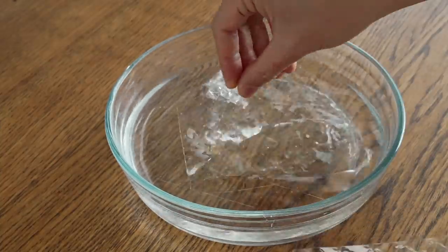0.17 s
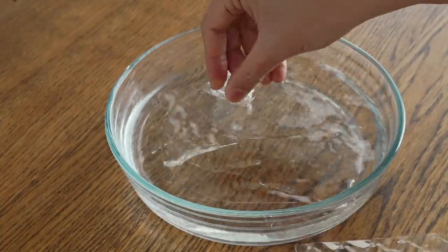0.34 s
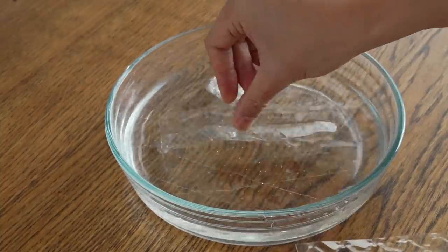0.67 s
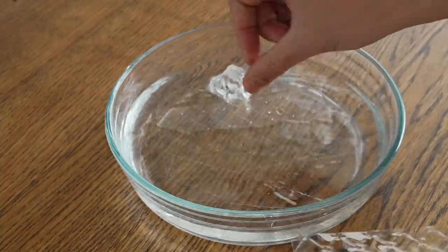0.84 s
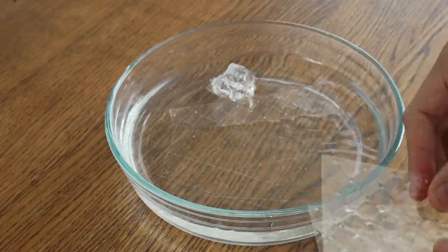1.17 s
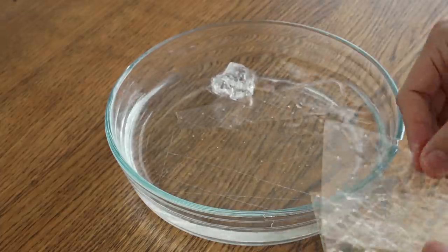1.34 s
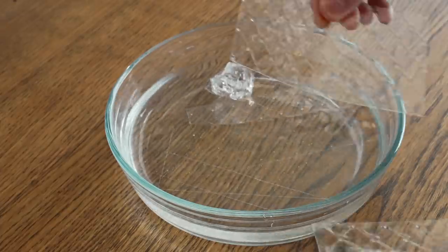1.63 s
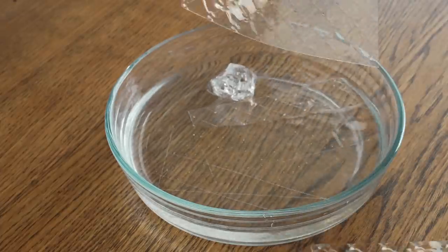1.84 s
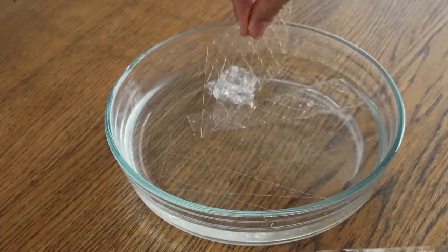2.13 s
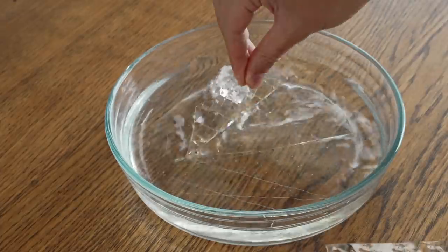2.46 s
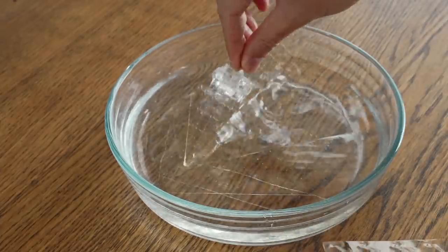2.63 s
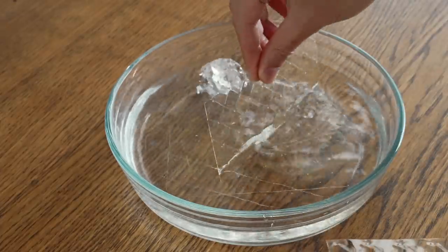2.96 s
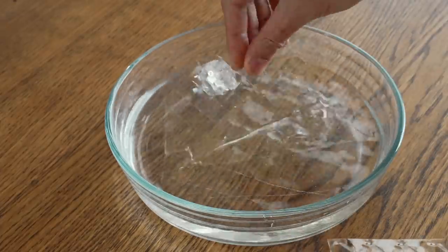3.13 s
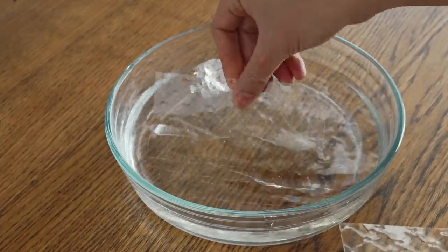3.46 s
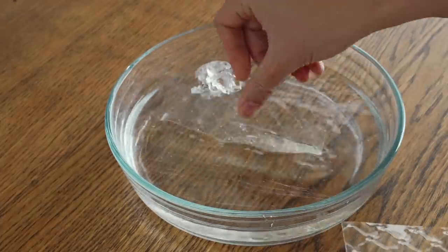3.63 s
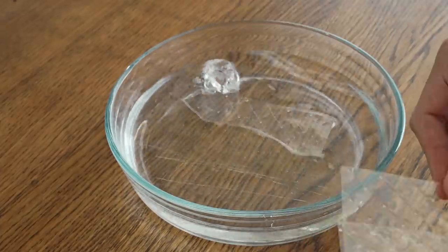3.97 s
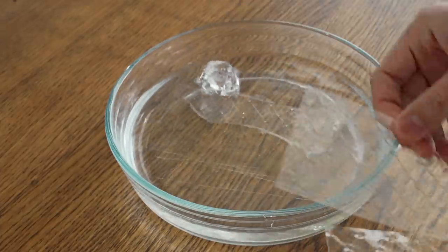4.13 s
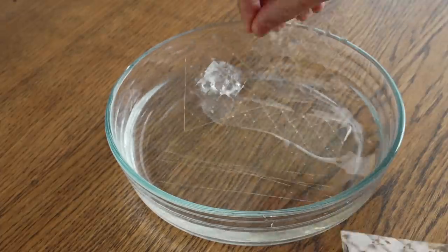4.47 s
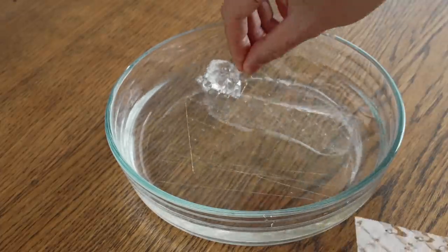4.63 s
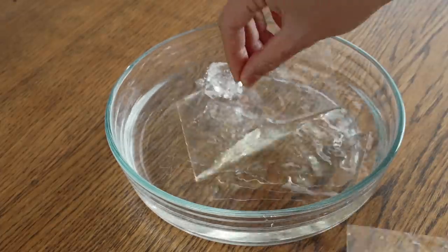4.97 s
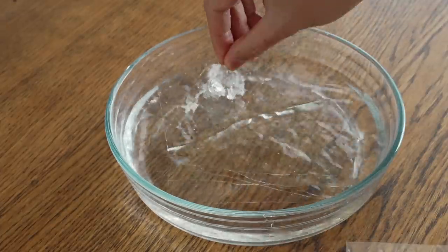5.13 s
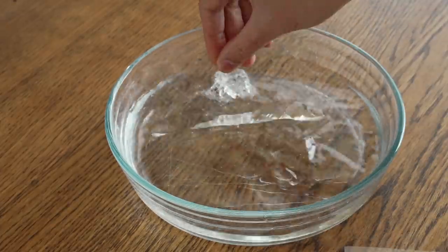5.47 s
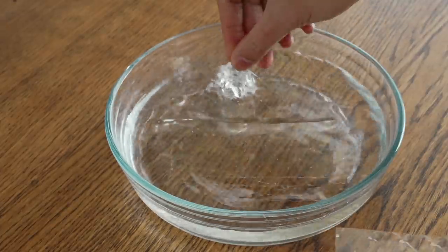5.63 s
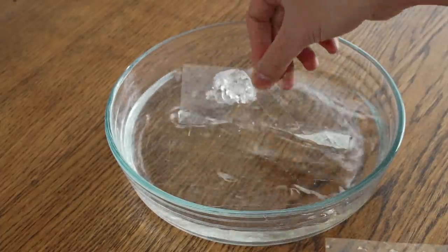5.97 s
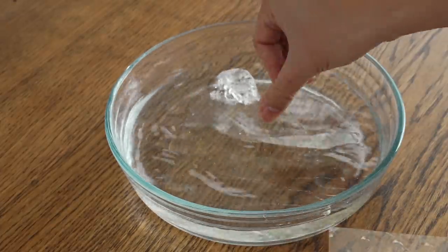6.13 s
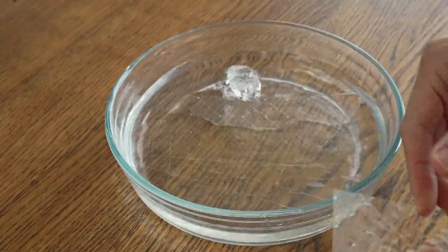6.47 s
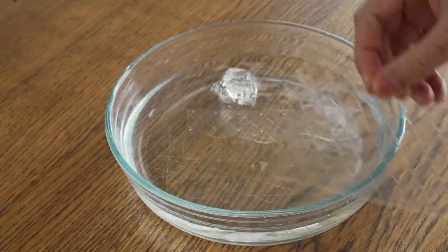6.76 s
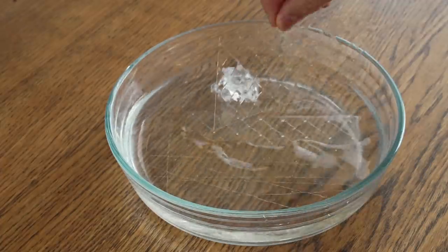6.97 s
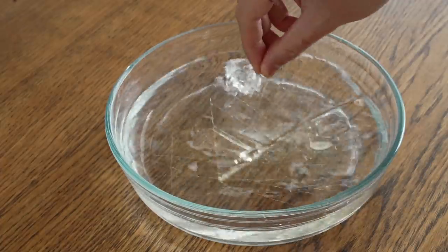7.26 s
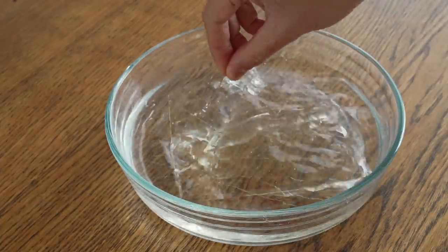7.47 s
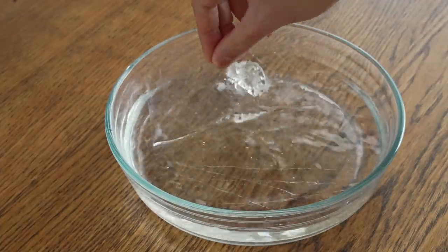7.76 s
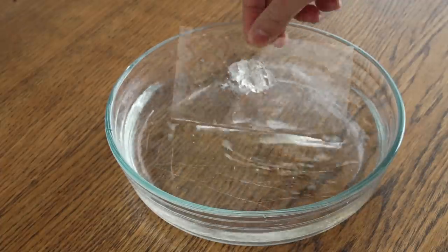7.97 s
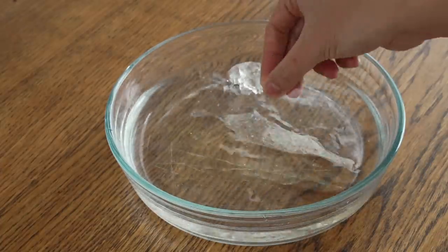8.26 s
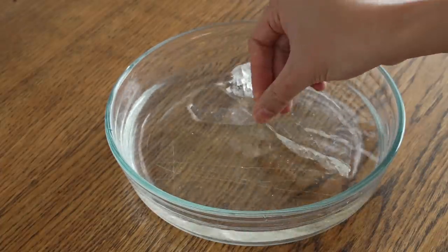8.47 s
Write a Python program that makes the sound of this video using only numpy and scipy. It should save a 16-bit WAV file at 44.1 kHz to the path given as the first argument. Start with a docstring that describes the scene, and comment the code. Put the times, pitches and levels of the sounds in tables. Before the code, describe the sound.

Close, dry and detailed in a small quiet room with barely audible air. Faint crackles and soft rubs open; a scrape swells into a bright sharp flick with a soft slap at 0.7 s. Tiny plops and crisp ticks come near 0.95 s. From 1.15 to 1.85 s, two ridged sheets rasp and crackle off the stack, with stray ticks until 2 s. Snaps and a small wet plop follow at 2.3 s, sparse quiet crackle, dull slaps at 3.4 s and a flick at 3.65 s. A stronger ratcheting drag runs 4.0-4.25 s, then wet slaps and a flop around 4.7 s. Quiet lapping and slaps lead to snaps and a loud flick at 6.0-6.2 s. More crackles and a table-side flick at 6.8 s precede heavy slaps at 7.15 s, the sharpest smack at 7.47 s, wet slaps at 8.15 s, and closing flicks at 8.4 and 8.55 s.

```python
"""Gelatin sheets pushed into a bowl of water

Stiff gelatin sheets are drawn from a stack and pushed one by one into a glass bowl of water on a wooden table.
Dry sheets crackle and snap as they bend: short bursts of noise, coloured by a bending resonance.
They scrape over one another and flick free: dense random grains that swell and end in a loud burst.
They slap the water, which laps in dull grains, plops in rising sine tones and faintly rings the bowl.
A small, quiet room answers with a short noise tail, over still air and a trace of hum."""
import sys
import numpy as np
from scipy import signal
from scipy.fft import rfft, irfft, next_fast_len
from scipy.io import wavfile
from scipy.ndimage import uniform_filter1d, map_coordinates

SR = 44100
rng = np.random.default_rng(int(sys.argv[2]) if len(sys.argv) > 2 else 0)


def transcribe(u):
    """Save the signal u as a 16-bit wav file named by the first command-line argument.

    u: samples, shape (n,) or (channels, n), limited to [-1, 1]; the rate is SR.
    q: integer samples, one column per channel.
    """
    v = np.clip(np.atleast_2d(u).T, -1, 1)
    q = np.round(v * 32767).astype(np.int16)
    wavfile.write(sys.argv[1], SR, q)


N = 379258  # length of the scene [samples]


def amp(db):
    """Turn decibels into an amplitude factor."""
    return 10 ** (np.asarray(db) / 20)


def unit(x):
    """Scale a signal to an rms of 1."""
    return x / np.sqrt(np.mean(x ** 2) + 1e-20)


def along(points, hz):
    """Read (frequency, value) points at any frequency, on a log axis."""
    point_hz, values = np.transpose(points)
    return np.interp(np.log(hz + 1), np.log(point_hz), values)


def add(track, s, x):
    """Mix x into the track at time s."""
    i = max(round(s * SR), 0)
    track[i:i + len(x)] += x[:max(len(track) - i, 0)]


def coloured(x, gain_db):
    """Filter x by a dB function of frequency, with no sound ahead of its cause (minimum phase)."""
    m = 2 * next_fast_len(len(x) // 2 + 1024)
    log_gain = np.maximum(gain_db(np.fft.rfftfreq(m, 1 / SR)), -120) * np.log(10) / 20
    cepstrum = irfft(log_gain)
    # Folding the second half onto the first makes the filter minimum phase
    cepstrum[1:m // 2] *= 2
    cepstrum[m // 2 + 1:] = 0
    return irfft(rfft(x, m) * np.exp(rfft(cepstrum)))[:len(x)]


def peaks(modes, hz):
    """Add up the dB gain of a few (centre [Hz], width [Hz], gain [dB]) resonances."""
    return sum(db / (1 + (2 * (hz - centre) / width) ** 2) for centre, width, db in modes)


def tone(thump_db, bite_db, sizzle_db):
    """Spectrum of one contact, from thump (bass) to sizzle (treble); a thin sheet radiates little bass."""
    points = [(60, thump_db - 35.5), (170, thump_db - 22.5), (330, thump_db - 4.0), (700, thump_db - 0.5),
              (1250, 0.3), (2200, 0.94), (3300, bite_db + 3), (6000, bite_db - 0.5),
              (9500, sizzle_db + .5), (16000, sizzle_db - 8)]
    return lambda hz: along(points, hz)


DRY_BITE_DB, DRY_BITE_SHARE = 4, .35  # the upper mids of a dry contact follow its sizzle


def dry_tone(thump_db, sizzle_db):
    """Spectrum of a dry snap."""
    return tone(thump_db, DRY_BITE_DB + DRY_BITE_SHARE * sizzle_db, sizzle_db)


def grains(size, rate, spread_db):
    """Tiny stick-slip releases of uneven size, about rate per second, rms 1."""
    hit = rng.random(size) < rate / SR
    sign = rng.choice([-1, 1], size)
    strength = amp(spread_db * np.minimum(rng.exponential(size=size), 4))
    return unit(hit * sign * strength)


def burst(fade_s, swell, colour):
    """A short shudder of the sheet, with the energy of 10 ms at rms 1; longer ones build up more slowly."""
    t, life = np.arange(SR // 8) / SR, max(fade_s, .002)
    rise = 1 - np.exp(-t / (swell * life))
    spectrum = rfft(rng.standard_normal(len(t)) * rise * amp(-60 * t / life))
    # Partly flatten the random spectrum, so that the colour filter sets the tone
    even = irfft(spectrum / np.sqrt(abs(spectrum) + 1e-12), len(t))
    x = coloured(even * rise * np.exp(-t / life), colour)
    return x * np.sqrt(SR / 100 / np.sum(x ** 2))


def shudder(colour, bend_hz, fade_s, swell, ring_db, ring_width):
    """One contact; the free length of the sheet sets its bending resonance."""
    bend = [(bend_hz, ring_width * bend_hz, ring_db)]
    return burst(fade_s, swell, lambda hz: colour(hz) + peaks(bend, hz))


# Where the held sheet is: (time [s], place [0 = over the stack, 1 = inside the bowl])
SHEET_PLACE = [(1.0, 1), (1.1, 0), (2.1, 0), (2.25, 1), (3.8, 1), (3.9, 0), (4.4, 0), (4.5, 1), (6.4, 1),
               (6.5, 0), (6.95, 0), (7.05, 1)]


def inside(s):
    """How far the held sheet is over the bowl at time s, 0-1."""
    return np.interp(s, *np.transpose(SHEET_PLACE))


# Tone of the still air in the room: (frequency [Hz], relative level [dB])
STILL_AIR = [(20, -26.5), (70, -32), (130, -25.5), (240, -19), (400, -25.5), (600, -28.5), (1000, -28.5),
             (2000, -33.5), (4400, -37), (10000, -44), (14000, -45.5), (16000, -40)]


def background(air_db, hum_hz, hum_db):
    """Still air as coloured noise, and a trace of mains hum as a sine."""
    air = unit(coloured(rng.standard_normal(N), lambda hz: along(STILL_AIR, hz)))
    hum = np.sin(2 * np.pi * hum_hz * np.arange(N) / SR)
    return amp(air_db) * air + amp(hum_db) * hum


# How long the room echoes: (frequency [Hz], time to fade by 60 dB [s])
ROOM_FADE = [(150, 0.12), (500, 0.31), (1500, 0.2), (5000, 0.23), (10000, 0.18), (16000, .2)]


def room(x, wet_db, treble_db, delay):
    """A short diffuse tail of fading noise, with fresh noise each quarter second."""
    out, step = np.zeros(N), SR // 4
    for i in range(0, N, step):
        hz, t, noise = signal.stft(rng.standard_normal(SR // 2), SR, nperseg=256)
        fade = amp(-60 * t / along(ROOM_FADE, hz)[:, None]) * (1 - np.exp(-t / delay))
        tail = signal.istft(noise * fade, SR, nperseg=256)[1]
        add(out, i / SR, signal.fftconvolve(x[i:i + step], tail / np.linalg.norm(tail)))
    colour = [(300, 1), (1500, -1.6), (6000, treble_db), (15000, treble_db)]
    return coloured(out, lambda hz: wet_db + along(colour, hz))


# Ringing tones of the glass bowl: (frequency [Hz], relative level [dB], time to fade by 60 dB [s])
BOWL_TONES = [(768.4, -5, 0.17), (1300, -6.5, .14), (1660, -6.5, .15), (1680, -10.5, 0.44),
              (1970, -5.5, 0.27), (3700, -8.5, .2), (4050, -8.5, .2)]


def bowl(x, ring_db):
    """The water-damped glass rings in fading sines with the slaps and lapping of the water."""
    t = np.arange(SR // 2) / SR
    ring = sum(amp(db - 60 * t / t60) * np.sin(2 * np.pi * hz * t) for hz, db, t60 in BOWL_TONES)
    return amp(ring_db) * signal.fftconvolve(x, ring)[:N]


# Resonances of the hollow of the bowl: (centre [Hz], width [Hz], gain [dB])
BOWL_HOLLOW = [(355, 87, 8.5), (520, 50, 1.5), (910, 67, -2.5), (1450, 160, 3), (1664, 89, 2),
               (2170, 210, -3), (2560, 350, 2), (2980, 430, -1), (3570, 310, 5), (4210, 100, 1),
               (5030, 1100, -1), (5900, 520, -1.5), (7710, 1000, 2)]
# Resonances of a sheet held just above the table top: (centre [Hz], width [Hz], gain [dB])
ABOVE_TABLE = [(790, 490, 4), (1460, 350, -7.5), (2010, 140, 4.5), (2850, 440, -6.5), (3500, 520, -0.5),
               (4670, 590, -1.5)]


def surroundings(sheets, over_bowl):
    """The hollow bowl or the table top colours the sound, depending on where the sheet is."""
    in_bowl = coloured(over_bowl * sheets, lambda hz: peaks(BOWL_HOLLOW, hz) - 1.5)
    at_table = coloured((1 - over_bowl) * sheets, lambda hz: peaks(ABOVE_TABLE, hz) - .6)
    return in_bowl + at_table


# Air bubbles: (time [s], starting pitch [Hz], level before a 6.5 dB lift [dB], time to fade by 60 dB [s])
AIR_BUBBLES = [(.916, 1102, -42, 0.06), (.916, 1774, -38.5, 0.018), (2.363, 1640, -30, 0.017),
               (2.937, 2740, -65.5, 0.15), (5.199, 8500, -63, .09), (6.527, 1126, -47.5, 0.049),
               (6.526, 1837, -48, 0.029), (7.154, 2675, -41.5, 0.22), (7.301, 3570, -57, 0.054),
               (7.301, 5010, -57.5, .05), (7.549, 5990, -31.5, 0.027), (7.569, 7280, -46.5, 0.087),
               (7.569, 2830, -46.5, 0.047), (8.036, 1213, -53, 0.023)]


def bubbles(rise, attack):
    """Each bubble rings and climbs a little in pitch as it nears the surface."""
    out, t = np.zeros(N), np.arange(SR // 5) / SR
    for s, hz, db, t60 in AIR_BUBBLES:
        pitch = hz * (1 + rise * np.minimum(t / t60, 1))
        phase = 2 * np.pi * np.cumsum(pitch) / SR
        add(out, s, amp(db + 6.5 - 60 * t / t60) * np.sin(phase) * (1 - np.exp(-t / attack)))
    return out


def slosh(splashes, rate, life, slosh_db):
    """Water stirred by a slap keeps lapping in small, dull grains."""
    keep = np.exp(-1 / (life * SR))
    stir = np.sqrt(signal.lfilter([1 - keep], [1, -keep], splashes ** 2))
    colour = [(100, -26.0), (330, -8.0), (800, -0.5), (1500, 2), (3000, -9.5), (8000, -26.5), (16000, -49.5)]
    laps = coloured(grains(N, rate, spread_db=1.0), lambda hz: along(colour, hz))
    return amp(slosh_db) * stir * unit(laps)


# A whole sheet flopping over: (time [s], level [dB], fade setting [s], centre [Hz])
SHEET_FLOPS = [(0.436, -44, 0.046, 297), (0.461, -53.5, 0.066, 290), (0.736, -45.5, 0.03, 300),
               (3.404, -52.5, 0.051, 225.5), (4.693, -39, 0.073, 377.5), (6.191, -48.5, 0.072, 320),
               (6.827, -44.5, 0.1, 354), (7.153, -35.5, 0.064, 438.4)]


def flops(swell, octaves):
    """A flopping sheet pushes out a soft, low puff of air."""
    out = np.zeros(N)
    for s, db, fade_s, centre_hz in SHEET_FLOPS:
        colour = lambda hz: -20 * np.log10(1 + (np.log2((hz + 1) / centre_hz) / octaves) ** 6)
        add(out, s, amp(db) * burst(fade_s, swell, colour))
    return out


# A sheet hits the water: (time [s], level [dB], fade setting [s], sizzle [dB], bending resonance [Hz])
WATER_SLAPS = [(.738, -41, .022, -15, 664), (2.362, -46, .016, -39, 1610), (2.869, -62, .02, -19.5, 1500),
               (2.935, -51, 0.029, -45, 1590), (3.333, -52, 0.03, -36, 1250),
               (3.357, -50.5, 0.045, -45.5, 950), (3.398, -43, 0.031, -49.5, 710),
               (3.412, -44.5, .03, -47.5, 496), (4.234, -41.5, 0.0095, -28, 1060),
               (4.682, -34.5, .014, -25, 2720), (4.6905, -29.5, 0.018, -44, 1540),
               (4.723, -36, .018, -24.5, 1430), (4.762, -48.5, .016, -34, 1490),
               (4.785, -54.5, .05, -28.5, 1500), (4.888, -57, .035, -45, 1420),
               (5.172, -53.5, .07, -50, 1580), (5.229, -55.5, .06, -40, 1460),
               (5.307, -57, .017, -42, 1530), (5.52, -50, .03, -64, 1530), (5.697, -42, 0.027, -40.5, 1450),
               (5.702, -39.5, 0.024, -42, 1410), (5.992, -39.5, .015, -30, 1488),
               (5.995, -31.5, .036, -42.5, 1364), (6.827, -39.5, .03, -26, 397),
               (7.132, -26, .022, -18.5, 1544), (7.151, -25.5, .018, -22.5, 1250),
               (7.16, -30.5, .014, -30, 1170), (7.173, -38.5, .048, -31.5, 1120),
               (7.206, -37.5, .018, -33, 1670), (7.229, -42, .007, -36.5, 1460),
               (7.461, -40, .03, -22, 1410), (7.4712, -20, .016, -22.5, 1840),
               (7.748, -38.5, .028, -36.5, 1450), (8.037, -66.5, 0.018, -35, 1290),
               (8.156, -31, 0.024, -53, 1550), (8.181, -35.5, .014, -41, 1960),
               (8.218, -50, 0.041, -34, 2460)]
WET_BITE_DB, WET_BITE_SHARE = 3, 0.47  # the upper mids of a slap follow its sizzle
# A longer sheet bends lower and thumps more
MID_BEND_HZ, SLAP_THUMP_DB, THUMP_DB_PER_OCTAVE, MAX_THUMP_DB = 1350, -2, -20, 9
USUAL_SIZZLE_DB, FLAT_HIT_SHARE = -32, 0.26  # a flatter, brighter slap also thumps more


def slaps():
    """The lower a sheet bends and the flatter it lands, the more water it pushes and the more it thumps."""
    out = np.zeros(N)
    for s, db, fade_s, sizzle_db, bend_hz in WATER_SLAPS:
        thump_db = SLAP_THUMP_DB + THUMP_DB_PER_OCTAVE * np.log2(bend_hz / MID_BEND_HZ)
        thump_db += FLAT_HIT_SHARE * (sizzle_db - USUAL_SIZZLE_DB)
        colour = tone(min(thump_db, MAX_THUMP_DB), WET_BITE_DB + WET_BITE_SHARE * sizzle_db, sizzle_db)
        add(out, s, amp(db) * shudder(colour, bend_hz, fade_s, swell=.14, ring_db=8.5, ring_width=0.3))
    return out


# Resonances of a sheet singing as it slides: (centre [Hz], width [Hz], gain [dB])
SLIDING_TONES = [(1250, 230, -1.5), (2530, 450, -0.5), (3020, 300, -4.5), (4070, 600, 2.5),
                 (13000, 4100, 1.5)]
RUB_BITE_DB, RUB_BITE_SHARE = 4, 0.64  # the upper mids of friction follow its sizzle
FLUTTER_HZ, FLUTTER_DB = 61, 2.1  # the pressure wavers: random values per second, and their spread


def scrape(size, thump_db, sizzle_db):
    """Dense stick-slip grains under uneven pressure, through the resonances of a sliding sheet, rms 1."""
    colour = tone(thump_db, RUB_BITE_DB + RUB_BITE_SHARE * sizzle_db, sizzle_db)
    knots = np.arange(size) * FLUTTER_HZ / SR
    waver = map_coordinates(rng.standard_normal(int(knots[-1]) + 2), [knots], mode='nearest')
    force = amp(FLUTTER_DB * waver) * grains(size, rate=1800, spread_db=1.27)
    return unit(coloured(force, lambda hz: colour(hz) + peaks(SLIDING_TONES, hz)))


# Soft rubs that swell and fade without a flick; all friction of this kind is later turned down 1 dB:
# (start time [s], length [s], level before that [dB], thump [dB], sizzle [dB])
SOFT_RUBS = [(.25, .06, -56.5, -26, -31), (.36, .08, -54.5, -13, -32), (.42, .065, -37.5, -7.5, -15),
             (.505, 0.11, -39, -25, -24.5), (.98, .13, -60.5, -6, 19), (1.82, 0.11, -63, -4, -13),
             (1.945, 0.12, -48.5, -15, -13), (2.28, .14, -44, -4.5, -37.5), (3.12, 0.12, -65.5, -18, -27.5),
             (3.225, .075, -53.5, -2, -6), (3.4, .13, -58, -6.5, -22), (3.5, 0.044, -48, -24, -21),
             (3.555, 0.057, -33.5, -38, -18.5), (3.92, 0.079, -56.5, -9.5, -2),
             (4.47, 0.19, -71.5, -4, -14), (4.93, 0.23, -62.5, -6.5, -12), (5.055, 0.051, -54.5, -11, -12),
             (6.04, .09, -39, -25, -15.5), (6.42, 0.063, -66, -2, -13.5), (6.54, .055, -44.5, 0.5, -14.5),
             (6.66, .08, -56.5, -21, -5.5), (8.18, 0.103, -50.5, -30, -35)]


def rubs(arch):
    """Friction rises and falls with the speed of the hand."""
    out = np.zeros(N)
    for s, length, db, thump_db, sizzle_db in SOFT_RUBS:
        speed = abs(np.sin(np.linspace(0, np.pi, int(length * SR))))
        add(out, s, amp(db) * speed ** arch * scrape(len(speed), thump_db, sizzle_db))
    return out


# Tone of the dragged sheet: (frequency [Hz], gain [dB])
DRAGGED_SHEET = [(200, -35), (350, -16), (800, -4.5), (1400, -2), (2100, 1), (3400, -0.5), (6800, -5),
                 (8000, -4.5), (10000, -14.5), (16000, -25.5)]
STEADY_DRAG_DB, SPEED_POWER = -43.5, .25  # level at the usual speed; speed against amplitude


def pull(rows, ridge_rate, spread_db, ridge_life, colour_spread_db, scrape_db, flex_gain_db):
    """Ridges of a dragged sheet catch and let go over a fine scrape; a slow drag breaks up into ticks."""
    s, *cols = np.transpose(rows)
    t = np.arange(s[0], s[-1], 1 / SR)
    level_db, flex_db, sizzle_db = [np.interp(t, s, c) for c in cols]
    speed = amp(SPEED_POWER * (level_db - STEADY_DRAG_DB))
    ridges = abs(grains(len(t), ridge_rate * speed, spread_db)) / np.sqrt(speed)
    fade = np.exp(-np.arange(SR // 50) / SR / ridge_life)

    def band(lo_hz, hi_hz):
        """One band of the drag; each ridge gets its own random strength here, and so its own colour."""
        strength = amp(colour_spread_db * rng.uniform(-1.4, 1, len(t)))
        slips = signal.fftconvolve(ridges * strength, fade)[:len(t)]
        force = rng.standard_normal(len(t)) * (unit(slips) + amp(scrape_db) * np.minimum(speed, 1))
        sos = signal.butter(3, [lo_hz, hi_hz], 'band', fs=SR, output='sos')
        return signal.sosfilt(sos, coloured(force, lambda hz: along(DRAGGED_SHEET, hz)))

    flex, sizzle = band(200, 1200), band(7500, 17000)
    body = band(1200, 2800) + band(2800, 4800) + band(4800, 7500)
    mix = unit(body) + amp(flex_db + flex_gain_db) * unit(flex) + amp(sizzle_db) * unit(sizzle)
    out = np.zeros(N)
    add(out, s[0], amp(level_db) * mix)
    return out


# Three drags of an embossed sheet off the stack, one list each; the level is later turned down 2 dB and
# the flexing raised a little: (time [s], level before that [dB], flexing before that [dB], sizzle [dB])
SHEET_DRAGS = [
    [(1.145, -30.5, -24, 4), (1.175, -57.5, -12, -2), (1.183, -36, -9.5, -8.5), (1.193, -41, -7, -5),
     (1.279, -49.5, -18, -5.5), (1.307, -41, -16, -3), (1.379, -45, -17, 2), (1.435, -33.5, -17, -7.5),
     (1.47, -62.5, -19, -5)],
    [(1.48, -47.5, -8, -1), (1.506, -37, -26, -13), (1.632, -41, -10.5, -18), (1.652, -40, -23, -6),
     (1.672, -60, -2, -17), (1.68, -45, -9, -12.5), (1.714, -56.5, -0.5, -17), (1.802, -44.5, -10.5, -20),
     (1.835, -61.5, -13, -19)],
    [(3.985, -42.5, -12, 1), (4.001, -34.5, 0, -10.5), (4.019, -38.5, -8, -4), (4.111, -37.5, -11, -1),
     (4.119, -28.5, -25, -9), (4.139, -41.5, -7, -1.5), (4.211, -26, -14.5, -11.5),
     (4.257, -48.5, 14.5, -9.5), (4.35, -68, 0, -19)],
]


def drags():
    """An embossed sheet is pulled off the stack three times."""
    return amp(-2.0) * sum(pull(rows, ridge_rate=260, spread_db=3.5, ridge_life=0.0018, colour_spread_db=5,
                                scrape_db=-3, flex_gain_db=0.4) for rows in SHEET_DRAGS)


# The deepest ridges catch during or between drags: (time [s], level [dB], bending resonance [Hz])
RIDGE_CATCHES = [(1.147, -37, 7540), (1.183, -37, 5890), (1.383, -37.5, 8090), (1.428, -31, 2120),
                 (1.456, -44, 2100), (1.532, -36.5, 4620), (1.566, -42, 1960), (1.6, -39, 3280),
                 (1.647, -39, 1880), (1.681, -39.5, 1920), (1.704, -47, 2180), (1.717, -48.5, 1740),
                 (1.731, -50, 740), (1.758, -43.5, 1840), (1.846, -42.5, 6450), (1.881, -51.5, 2970),
                 (1.904, -40.5, 6100), (1.928, -51.5, 1760), (1.947, -38, 7500), (1.959, -36.5, 6550),
                 (1.983, -37.5, 3320), (3.998, -30.5, 2020), (4.005, -30.5, 526), (4.045, -37, 7500),
                 (4.086, -35.5, 3340), (4.115, -33.5, 3320), (4.129, -28.5, 7380), (4.162, -36, 3940),
                 (4.18, -31.5, 1190), (4.203, -27, 7780), (4.221, -32, 4100)]


def catches(fade_s, thump_db, sizzle_db):
    """A ridge catches with a short snap; its colour is interpolated between the drag points."""
    out = np.zeros(N)
    times, _, flex, sizzle = np.concatenate(SHEET_DRAGS).T
    for s, db, bend_hz in RIDGE_CATCHES:
        colour = dry_tone(thump_db + np.interp(s, times, flex), sizzle_db + np.interp(s, times, sizzle))
        add(out, s, amp(db) * shudder(colour, bend_hz, fade_s, swell=0.13, ring_db=11.5, ring_width=0.33))
    return out


def flexed(x, depth_db):
    """Bending keeps shifting the resonances of a sheet, so patches of its spectrum come and go."""
    z = signal.stft(x, nperseg=256)[2]
    field = uniform_filter1d(rng.standard_normal(z.shape), size=2, axis=0)  # smooth over frequency
    field = uniform_filter1d(field, size=7, axis=1)  # and over time
    gain = unit(amp(depth_db * np.clip(unit(field), -2, 2)))
    return signal.istft(z * gain, nperseg=256)[1][:N]


# A sheet slides ever faster under the finger and flicks free; the scrape is later turned down 1 dB:
# (time [s], run-up [s], scrape level before that [dB], flick level [dB],
#  scrape sizzle [dB], flick sizzle [dB], bending resonance [Hz])
EDGE_FLICKS = [(.7317, .09, -29.5, -24, -12.5, 9.5, 5230), (3.6458, .15, -32, -28, -20, -13.5, 1750),
               (6.1902, .19, -30, -19, -16.5, -4.5, 1595), (6.7813, .075, -29, -19, -12, -13, 1960),
               (8.3824, .1, -32, -24, -26, -8.5, 1366), (8.5486, .07, -36.5, -30.5, -9.5, 6.5, 4355)]
RUN_UP_THUMP_IN_BOWL_DB, RUN_UP_THUMP_ON_STACK_DB = -28, -9  # the table lends a scrape some bass too
SWELL_POWER = 1.5  # scrape amplitude against the share of the run-up gone by
GRAB_S, GRAB_DB = .005, -.5  # the edge grips harder just before it lets go; level against the flick
RELEASE_S = .0054  # how fast the scrape dies once the edge is free


def run_ups():
    """Friction swells as an edge gathers speed, grips, and stops when it comes free."""
    out = np.zeros(N)
    for s, run_up, scrape_db, flick_db, sizzle_db, _, _ in EDGE_FLICKS:
        t = np.arange(-run_up, 10 * RELEASE_S, 1 / SR)
        before = np.minimum(t, 0)
        thump_db = np.interp(inside(s), [0, 1], [RUN_UP_THUMP_ON_STACK_DB, RUN_UP_THUMP_IN_BOWL_DB])
        swelling = amp(scrape_db) * abs(1 + before / run_up) ** SWELL_POWER
        grab = amp(flick_db + GRAB_DB) * np.exp(before / GRAB_S)
        release = np.exp(-np.maximum(t, 0) / RELEASE_S)
        add(out, s - run_up, (swelling + grab) * release * scrape(len(t), thump_db, sizzle_db))
    return out


FLICK_FADE_S, FLICK_THUMP_DB = .012, -19


def flicks():
    """The freed edge springs straight with a loud snap."""
    out = np.zeros(N)
    for s, _, _, db, _, sizzle_db, bend_hz in EDGE_FLICKS:
        colour = dry_tone(FLICK_THUMP_DB, sizzle_db)
        snap = shudder(colour, bend_hz, FLICK_FADE_S, swell=.09, ring_db=11.5, ring_width=0.22)
        add(out, s, amp(db) * snap)
    return out


def settling(cracks, rate, life, settle_db):
    """After each snap the creased sheet relaxes in a few faint ticks."""
    keep = np.exp(-1 / (life * SR))
    strain = np.sqrt(signal.lfilter([1 - keep], [1, -keep], cracks ** 2))
    colour = tone(thump_db=-6.5, bite_db=-3.0, sizzle_db=-16.5)
    ticks = coloured(grains(N, rate, spread_db=-0.5), colour)
    return amp(settle_db) * strain * unit(ticks)


# A bent sheet buckles: (time [s], level [dB], sizzle [dB], bending resonance [Hz])
SHEET_SNAPS = [(.011, -43, -49, 1690), (.03, -48.5, -31, 1680), (.094, -55, -7, 1280),
               (.13, -43.5, -55, 1500), (.17, -42.5, -43, 2030), (.955, -39.5, 14, 11860),
               (0.9614, -35.5, 21, 9300), (.971, -41, 15, 12000), (.976, -44.5, 17, 11860),
               (2.308, -42, -30.5, 1870), (2.319, -42, -15, 1715), (2.34, -34, -26, 1420),
               (2.385, -46, -19, 3470), (2.495, -52, -20, 1950), (2.569, -57, -44, 2460),
               (2.634, -46.5, -28.5, 2760), (2.737, -66, -5, 10640), (3.317, -55, -9.5, 4240),
               (3.718, -51, 2, 5710), (3.753, -45.5, -3.5, 5870), (3.765, -46, 10.5, 6060),
               (3.868, -58.5, 1, 6970), (3.915, -55, -5.5, 6040), (3.921, -42, 5, 5930),
               (3.983, -44, -0.5, 910), (5.122, -59.5, 4, 10640), (5.198, -55, 18, 9900),
               (6.044, -33.5, -25, 1910), (6.133, -29.5, -17.5, 1500), (6.36, -63, 18.5, 11860),
               (6.547, -40, -14, 3600), (6.593, -35.5, -22, 3410), (6.604, -38.5, -26, 1100),
               (7.266, -48, -11, 2870), (7.301, -50.5, 10.5, 3940), (7.546, -39.5, -15.5, 5850),
               (7.569, -36, 2.5, 8400), (7.795, -44.5, -34, 1410)]
SNAP_FADE_S = .011
THUMP_IN_BOWL_DB, THUMP_ON_STACK_DB = -15, -2.5  # the table under the stack lends a snap some bass


def snaps():
    """Single buckles, with more bass over the stack than over the bowl."""
    out = np.zeros(N)
    for s, db, sizzle_db, bend_hz in SHEET_SNAPS:
        thump_db = np.interp(inside(s), [0, 1], [THUMP_ON_STACK_DB, THUMP_IN_BOWL_DB])
        colour = dry_tone(thump_db, sizzle_db)
        add(out, s, amp(db) * shudder(colour, bend_hz, SNAP_FADE_S, swell=.088, ring_db=10.5, ring_width=.2))
    return out


def scene():
    """Dry and wet contacts, coloured by the bowl or the table top, in the room."""
    cracks = snaps() + flicks() + catches(fade_s=.012, thump_db=4.5, sizzle_db=-1)
    friction = flexed(amp(-1) * (rubs(arch=1.1) + run_ups()) + drags(), depth_db=3.5)
    splashes = slaps()
    water = splashes + slosh(splashes, rate=500, life=0.01, slosh_db=-9.0)
    ticks = settling(cracks, rate=190, life=.018, settle_db=-23.5)
    sheets = cracks + ticks + friction + water
    over_bowl = inside(np.arange(N) / SR)
    near = surroundings(sheets, over_bowl)
    near += flops(swell=.044, octaves=0.5)
    near += bubbles(rise=0.037, attack=.0013)
    near += bowl(over_bowl * water, ring_db=-58.5)
    echo = room(near, wet_db=-9.5, treble_db=-5.0, delay=.00067)
    return (near + echo + background(air_db=-73, hum_hz=49, hum_db=-88.5))[None]


TOP_HZ = 16200  # nothing sounds from here up


def record(dry):
    """Remove everything from the top frequency up, then rest slightly below zero."""
    m = next_fast_len(N + SR // 2)
    passed = np.fft.rfftfreq(m, 1 / SR) < TOP_HZ
    return irfft(rfft(dry, m) * passed, m)[..., :N] - .0007


dry = scene()
out = record(dry)
transcribe(out)
```